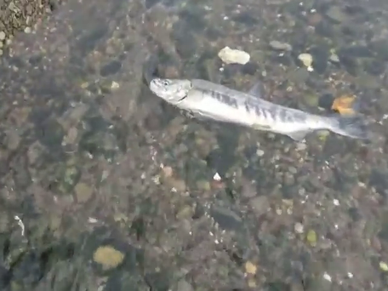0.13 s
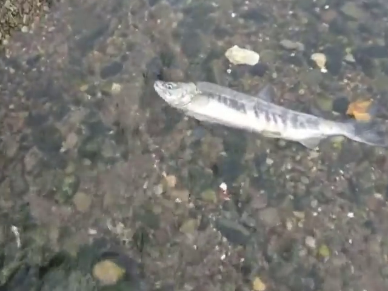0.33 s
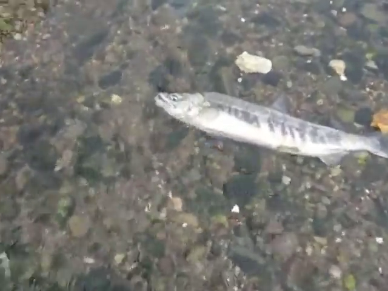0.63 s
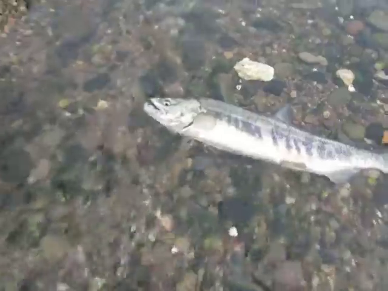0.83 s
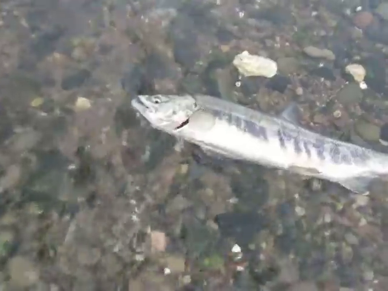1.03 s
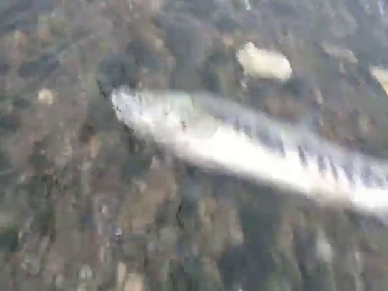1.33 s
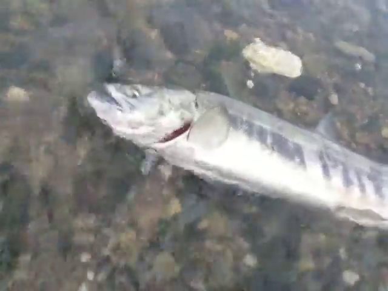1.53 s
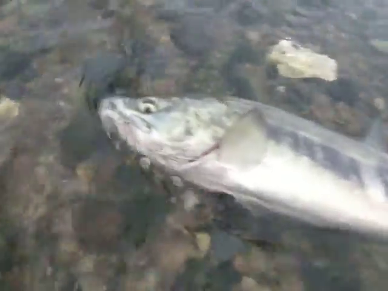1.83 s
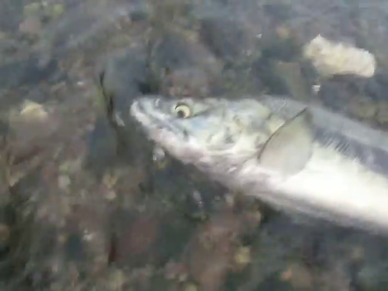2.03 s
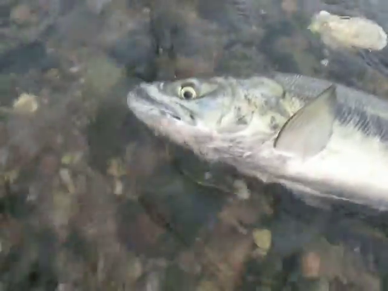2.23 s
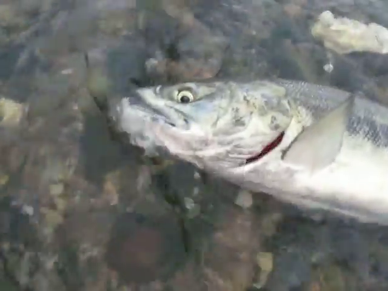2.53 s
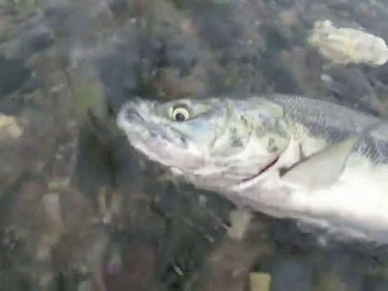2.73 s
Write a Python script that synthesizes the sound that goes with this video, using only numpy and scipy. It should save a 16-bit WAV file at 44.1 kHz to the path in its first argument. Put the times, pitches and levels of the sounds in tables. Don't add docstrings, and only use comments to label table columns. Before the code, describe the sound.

A shallow stream babbles steadily over pebbles, heard close on a small hand-held camera outdoors. Bubbles, fizz and tiny drops sparkle over a soft wash; four hard plastic clicks come midway, with a faint motor hum.

```python
import sys
import numpy as np
from scipy import signal
from scipy.fft import rfft, irfft
from scipy.io import wavfile
from scipy.ndimage import uniform_filter1d

SR = 44100
rng = np.random.default_rng(int(sys.argv[2]) if len(sys.argv) > 2 else 0)


def invert_db(x):
    u = np.asarray(x, float) / 20
    return 10 ** u


def to_wav(sig):
    pcm = np.clip(np.atleast_2d(sig), -1, 1) * 32767
    pcm = np.round(pcm).astype(np.int16)
    wavfile.write(sys.argv[1], SR, pcm.T)


N = 126567

# time in seconds, level in dB.
SURGE = [
    (0.0, -46),
    (1.37, -46.5),
    (2.16, -49),
    (2.87, -49.5),
]
# frequency in Hz, density in dB per Hz.
WASH_SPECTRUM = [(18, -43), (32, -10), (85, -9.5), (150, -8.5), (330, -11.5), (900, -10), (4000, -18),
                 (16000, -23.5)]
# centre in Hz, width in Hz, level in dB.
MOTOR_HUM = [
    (121.7, 11, -58.5),
    (58.7, 17, -69.5),
]
SNAP_START_S = [1.46585, 1.61575, 1.7086, 1.9894]
# peak in dB, brightness in dB, rebound in dB, outer modes in dB.
SNAP_LEVELS = [
    (-10.5, 5, -6, 3.5),
    (-9, 2, -4.5, 5),
    (-18, 5, 2.5, 4.5),
    (-10, -4, -10, -13),
]
# frequency in Hz, level in dB, T60 in seconds.
CASE_MODES = [(546, -24.5, 0.17), (1560, -11, 0.03), (1890, -11, 0.019), (2280, -0.5, 0.019),
              (2870, 10.5, 0.0064), (3480, 2, 0.0072), (4220, 2, 0.011), (5130, 6, 0.0046),
              (5500, 2, 0.0098), (8220, 2.5, 0.0033), (9330, -2, 0.0073), (9970, 2, 0.0058),
              (11400, 2.5, 0.0038), (13300, 0, .003)]
# delay in seconds, level in dB.
CASE_REBOUNDS = [(.0025, 0), (.0043, -4), (.0062, -14)]
# time in seconds, peak in dB, pitch in Hz.
MORE_BRIGHT_DROPS = [(0.0914, -25, 5370), (.2176, -32, 8260), (.2869, -31, 9100), (0.316, -32, 9100),
                     (.3845, -34, 8200), (0.4892, -30, 9100), (0.7959, -30, 9500), (0.826, -31, 8600),
                     (1.1406, -33, 9000), (1.841, -36, 5160), (2.15, -30.5, 8400), (2.2617, -32, 10500),
                     (2.375, -28.5, 9100), (2.5095, -27, 9300), (2.5544, -37, 8600), (2.574, -25, 12100),
                     (2.6, -46, 9700), (2.6227, -36, 9300), (2.8087, -30.5, 9700), (2.843, -36, 9400)]
# start in seconds, peak in dB, pitch in Hz, ring in cycles.
BUBBLES = [(0.037, -28, 2080, 6.3), (0.089, -35, 1160, 8.8), (0.195, -26, 3150, 4),
           (0.371, -37.5, 1300, 7.5), (0.41, -31.5, 3000, 14), (0.45, -34, 934, 14), (0.476, -39, 1560, 12),
           (0.506, -34.5, 1420, 10), (0.609, -36, 2400, 14), (0.812, -33.5, 2370, 10), (0.85, -28, 2120, 8),
           (0.915, -34.5, 1590, 14), (0.96, -33.5, 1550, 8.8), (1.064, -29.5, 1970, 8.7),
           (1.24, -27, 2900, 8.1), (1.258, -28.5, 1780, 11), (1.278, -31.5, 1410, 22),
           (1.319, -30, 1560, 11), (1.432, -32, 1840, 30), (1.505, -38.5, 668, 16),
           (1.548, -34, 1650, 22), (1.589, -32.5, 1690, 26), (1.669, -31, 1940, 12),
                (1.728, -23.5, 1760, 5.6), (1.778, -36.5, 645, 6.4), (1.793, -26.5, 2130, 11),
                (1.857, -27, 1710, 4.8), (1.865, -29.5, 1460, 11), (1.915, -26.5, 1530, 9.6),
                (1.991, -37, 500, 13), (2.133, -33, 1810, 17), (2.384, -37, 1650, 10),
                (2.43, -34, 1200, 7.9), (2.663, -33, 2160, 25), (2.844, -24.5, 2900, 12)]
# start in seconds, peak in dB, pitch in Hz, ring in cycles.
SMALL_BUBBLES = [(0.0852, -36, 5150, 8.2), (0.307, -30, 4800, 13), (1.049, -33.5, 3800, 17),
                 (2.2826, -34.5, 3380, 12), (2.385, -30.5, 4740, 13), (2.4024, -36.5, 5070, 17),
                 (2.4334, -29, 3130, 8.6), (2.4626, -30.5, 2400, 7.7), (2.715, -27, 3590, 8.5)]
# loudest moment in seconds, peak in dB, pitch in Hz.
FAINT_BUBBLES = [(.078, -42, 1130), (0.088, -37, 3290), (.119, -38.5, 2300), (.122, -46, 1110),
                 (.178, -44, 1000), (.196, -41, 2450), (.248, -43, 965), (.29, -45, 1800),
                 (.376, -43, 1840), (.379, -45, 1000), (.39, -39, 1570), (.424, -46, 1910),
                 (.558, -47, 880), (.733, -45, 1930), (.762, -41, 1020), (.794, -46.5, 640),
                 (0.796, -45, 1180), (.869, -41.5, 1030), (.904, -41, 4240), (1.004, -41, 3660),
                 (1.007, -42, 2070), (1.052, -44, 800), (1.2, -43, 2750), (1.234, -41, 1580),
                 (1.4, -41, 2730), (1.419, -40, 2390), (1.506, -39, 2020), (1.581, -35.5, 2420),
                 (1.652, -39, 867), (1.808, -36, 1730), (1.842, -40.5, 1095), (1.94, -38, 2380),
                 (1.964, -39, 1850), (1.969, -37, 2370), (2.071, -40, 1560), (2.104, -39.5, 1240),
                 (2.136, -42, 1280), (2.161, -41, 1220), (2.265, -38, 1980), (2.29, -41, 2300),
                 (2.299, -43, 955), (2.444, -35.5, 1260), (2.512, -45, 2950), (2.542, -38.5, 2760),
                 (2.545, -44, 1450), (2.568, -41, 2350), (2.571, -44, 1000), (2.625, -44, 1100),
                 (2.808, -43, 1380), (2.49, -44, 1150), (2.587, -44, 1570), (2.224, -44.5, 1346),
                 (2.185, -43, 903), (2.826, -37.5, 2430), (2.831, -45, 1900)]
# start in seconds, length in seconds.
POCKET_TIMES = [(2.034, .021), (1.334, .014), (.05, .04), (.682, .042), (.518, .03), (.652, .018),
                (1.17, .037), (2.257, .025), (.666, .022)]
# start in Hz, end in Hz, level in dB, lateness of the swell (exponent).
POCKET_VOICES = [
    (720, 2830, -32.5, 1.75),
    (2730, 3200, -37.5, 0.56),
    (2070, 1250, -38.5, 0.45),
    (408, 528, -44, 1.1),
    (760, 1020, -38.5, 0.85),
    (1200, 1070, -38, .6),
    (741, 920, -34, 0.31),
    (640, 635, -38, 0.61),
    (1000, 1100, -43, 0.87),
]
# time in seconds, peak in dB, pitch in Hz.
DROPS = [
    (0.0508, -20, 4150),
    (0.1461, -10.5, 5400),
    (0.2644, -28.5, 3950),
    (0.3694, -30.5, 5000),
    (0.599, -26, 6450),
    (0.7554, -36, 3470),
    (0.9936, -29.5, 4700),
    (1.276, -29.5, 5300),
    (1.4804, -19.5, 3700),
]
# time in seconds, peak in dB, pitch in Hz.
BRIGHT_DROPS = [(0.3223, -18.5, 9100), (0.3522, -28, 7940), (0.8138, -30, 9000), (1.037, -28, 7200),
                (1.169, -30, 7250), (1.226, -25.5, 9000), (1.8087, -32, 6900), (1.85, -31, 7000),
                (1.9124, -34, 7760), (1.9205, -26, 8200), (1.9733, -22, 8300), (2.1234, -23, 11300),
                (2.356, -32, 7700), (2.4229, -31, 7600), (2.5047, -4.5, 7450), (2.5583, -31, 8060),
                (2.6466, -26, 10200), (2.7418, -31.5, 8700), (2.804, -28, 8400), (2.822, -35, 9300)]
# frequency in Hz, gain in dB.
MIC_RESPONSE = [(7500, 0), (9800, 3), (10800, -3), (11400, -12.5), (11780, -30), (12200, -12), (15800, -18),
                (16500, -45)]

GUSH_S, GUSH_WIDTH_S, GUSH_GAIN = (.092, .375, .6, 1.345, 2.385), .014, 1.6


def evened(x):
    return x / np.sqrt(np.mean(x ** 2) + 1e-20)


def read(points, hz):
    point_hz, value = np.transpose(points)
    return np.interp(np.log(hz + 1), np.log(point_hz + 1), value)


def add(mix, start_s, sound):
    part = mix[round(start_s * SR):][:len(sound)]
    part += sound[:len(part)]


def surge(share, gush=0):
    s, db = np.transpose(SURGE)
    t = np.arange(N) / SR
    rushes = sum(np.exp(-((t - at) / GUSH_WIDTH_S) ** 2) for at in GUSH_S)
    return invert_db(share * np.interp(t, s, db - db.mean())) * (1 + gush * rushes)


def wash():
    patch_db, flicker_db, level_db = 1.5, 1.44, -47
    frames, hz = N // 128 + 5, np.fft.rfftfreq(512, 1 / SR)
    real, imag, raw = rng.standard_normal((frames, 257, 3)).T
    flicker = evened(uniform_filter1d(uniform_filter1d(raw, 90, 0), 3, 1))
    patches = evened(uniform_filter1d(uniform_filter1d(raw, 5, 0), 14, 1))
    gain_db = patch_db * patches + flicker_db * flicker * (hz > 1500)[:, None]
    noise = signal.istft((real + 1j * imag) * invert_db(gain_db), nperseg=512, noverlap=384)[1][:N]
    colour = invert_db(read(WASH_SPECTRUM, np.fft.rfftfreq(N, 1 / SR)))
    return invert_db(level_db) * evened(irfft(rfft(noise) * colour, N))


def motors():
    whine_hz, whine_rms_db, from_s, to_s = 5879, -66, 1.3, 2.55
    t, hz = np.arange(N) / SR, np.fft.rfftfreq(N, 1 / SR)
    fade = np.clip(np.minimum(t - from_s, to_s - t) / 0.1, 0, 1)
    out = np.sqrt(2) * invert_db(whine_rms_db) * np.sin(2 * np.pi * whine_hz * t) * fade
    for centre_hz, width_hz, db in MOTOR_HUM:
        spectrum = rfft(rng.standard_normal(N)) * np.exp(-((hz - centre_hz) / width_hz) ** 2)
        waver = evened(irfft(spectrum, N))
        out += invert_db(db) * evened(np.sin(2 * np.pi * centre_hz * t) + 0.36 * waver)
    return out


def case():
    low_hz, dull_hz, bright_hz = 2500, 4500, 7000
    knock_hz, knock_s, knock_db = 2400, 0.00019, -0.5
    t, out = np.arange(3000) / SR, np.zeros(N)
    hz, db, t60_s = np.transpose(CASE_MODES)[:, :, None]
    phases = 1.39 * rng.standard_normal((len(SNAP_LEVELS), len(CASE_MODES), 1))
    late_s = t - .0008
    knock = -invert_db(knock_db) * np.exp(-(late_s / knock_s) ** 2) * np.cos(2 * np.pi * knock_hz * late_s)
    outer = (hz < low_hz) | (hz > dull_hz) & (hz < bright_hz)
    attack = np.minimum(t / 0.00024, 1) ** 2
    for s, (peak_db, bright_db, rebound_db, outer_db), phase in zip(SNAP_START_S, SNAP_LEVELS, phases):
        colour_db = db + bright_db * (hz > bright_hz) + outer_db * outer
        modes = invert_db(colour_db - 60 * t / t60_s) * np.cos(2 * np.pi * hz * (t - 1 / 4000) + phase)
        modes *= -attack * invert_db(peak_db - 11.0)
        add(out, s, modes.sum(0))
        dull = modes[hz[:, 0] < dull_hz].sum(0)
        for delay_s, late_db in CASE_REBOUNDS:
            add(out, s + delay_s, invert_db(late_db + rebound_db - 6.5) * dull)
            add(out, s + delay_s - .0003, invert_db(late_db + rebound_db + peak_db) * knock)
    return signal.sosfilt(signal.butter(2, 500, "high", fs=SR, output="sos"), out)


def bursting_drop(hz, db):
    cycles, echo_s, echo_db = 4.13, 0.0017, -38.5
    edge_db, top_hz, top_db = -1, 13700, -28
    t = np.arange(-.002, .03, 1 / SR)
    u = t * hz / cycles
    hump = np.exp(-np.where(u < 0, 22, 2.6) * u ** 2)
    edge = invert_db(edge_db) * np.cos(2 * np.pi * min(1.73 * hz, .4 * SR) * t)
    edge += invert_db(top_db) * np.cos(2 * np.pi * top_hz * t)
    burst = hump * np.cos(2 * np.pi * hz * t) + hump ** 4 * edge
    scatter = evened(np.convolve(rng.standard_normal(len(t)), burst[:200], "same"))
    scatter *= (t > 0) * np.exp(-abs(t) / echo_s)
    return invert_db(db - 3.5) * burst + invert_db(echo_db + 0.45 * (db + 31)) * scatter


def drops(events):
    lag_s, out = 0.00094, np.zeros(N)
    for s, db, hz in events:
        add(out, s + lag_s - .002, bursting_drop(hz, db))
    return out


def bubble(hz, cycles, glide=.05, rise_cycles=4.0):
    cycles = max(cycles, 1)
    u = np.arange(int(3 * cycles * SR / hz)) * hz / SR
    shape = (1 - np.exp(-u / rise_cycles)) * np.exp(-2.5 * u / cycles)
    pitch_hz = np.minimum(hz * (1 - glide / 2 + glide * u / cycles), .45 * SR)
    return shape / shape.max() * np.sin(2 * np.pi * np.cumsum(pitch_hz) / SR)


def swarm(per_s, band_hz, cycles, spread_db, clump, rise_cycles, mid_hz, octaves, count=36):
    clumps = np.exp(clump * evened(uniform_filter1d(rng.standard_normal(N), 350)))
    hit = rng.random(N) < per_s / SR * clumps / clumps.mean()
    size = invert_db(spread_db * np.minimum(rng.exponential(1, N), 3.5)) * hit
    kind, vary, out = rng.integers(0, count, N), rng.random((count, 2)), np.zeros(N)
    for k, hz in enumerate(np.geomspace(*band_hz, count)):
        ring = evened(bubble(hz, cycles * (.5 + vary[k, 0]), 0.44 * vary[k, 1] - .15, rise_cycles))
        ring *= np.exp(-(np.log2(hz / mid_hz) / octaves) ** 2 / 2) / np.sqrt(len(ring))
        out += signal.oaconvolve(size * (kind == k), ring)[:N]
    return evened(out)


def babble():
    return invert_db(-47.6) * surge(0.046) * swarm(950, (600, 4500), 19, 1.5, .6, 3.1, 1300, 0.8)


def fizz():
    return invert_db(-53) * surge(2.44, GUSH_GAIN) * swarm(1100, (2302, 15760), 7.4, 3, .55, 1.9, 4500, 1.53)


def crackle():
    return invert_db(-57) * surge(1) * swarm(200, (7300, 16000), 2.0, 0, 1.0, .3, 11000, 3.5, count=8)


def single_bubbles():
    faint_cycles, lead_cycles, out = 16.8, 5.96, np.zeros(N)
    for s, db, hz, cycles in BUBBLES + SMALL_BUBBLES:
        add(out, s, invert_db(db - 2.0) * bubble(hz, cycles))
    for s, db, hz in FAINT_BUBBLES:
        add(out, s - lead_cycles / hz, invert_db(db) * bubble(hz, faint_cycles))
    return out


def air_pockets():
    out = np.zeros(N)
    for (s, length_s), (from_hz, to_hz, db, lean) in zip(POCKET_TIMES, POCKET_VOICES):
        u = np.arange(0, 1, 1 / (length_s * SR))
        pitch_hz = from_hz * (to_hz / from_hz) ** u
        swell = np.sin(np.pi * u ** lean)
        add(out, s, invert_db(db) * swell * np.sin(2 * np.pi * np.cumsum(pitch_hz) / SR))
    return out


def water():
    swarms = babble() + fizz() + crackle()
    return swarms + single_bubbles() + air_pockets() + drops(DROPS + BRIGHT_DROPS)


def stones(near):
    level_db, t60_s = -20, .025
    t = np.arange(200, 4000) / SR
    tail = np.append(np.zeros(200), rng.standard_normal(len(t)) * invert_db(-60 * t / t60_s))
    return invert_db(level_db) * signal.oaconvolve(near, tail / np.linalg.norm(tail))[:N]


def scene():
    near = water()
    stream = near + stones(near) + wash() * surge(0.16)
    return (stream + case() + motors() + drops(MORE_BRIGHT_DROPS))[None]


def low_pass(x):
    return signal.sosfilt(signal.butter(12, 16500, fs=SR, output="sos"), x)


def record(dry):
    log_gain = np.log(invert_db(read(MIC_RESPONSE, abs(np.fft.fftfreq(4096, 1 / SR)))))
    taps = np.fft.ifft(np.exp(np.conj(signal.hilbert(log_gain)))).real[:2048]
    mix = signal.oaconvolve(dry, taps[None])[:, :N]
    return low_pass(mix)


dry = scene()
out = record(dry)
to_wav(out)
```